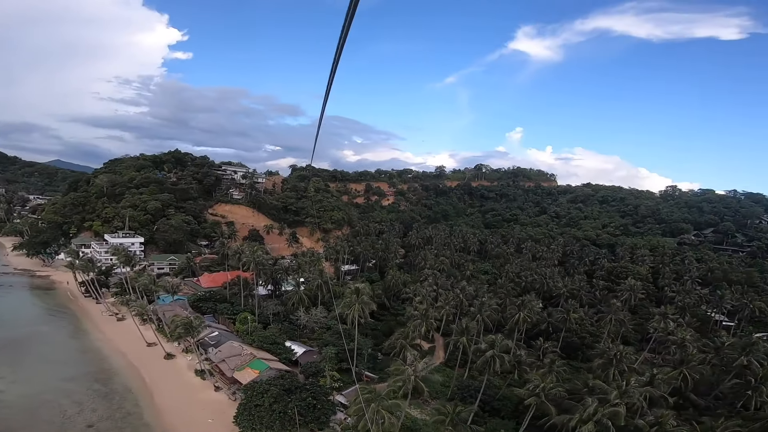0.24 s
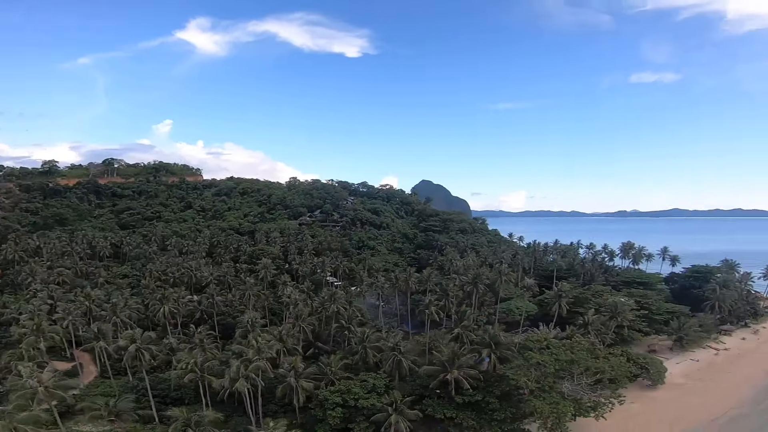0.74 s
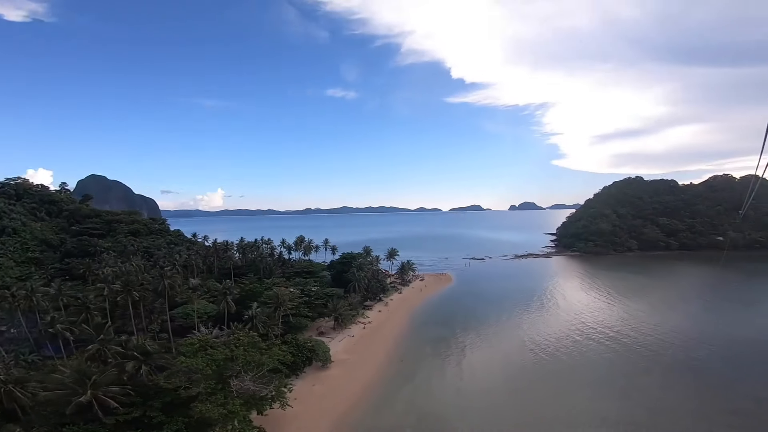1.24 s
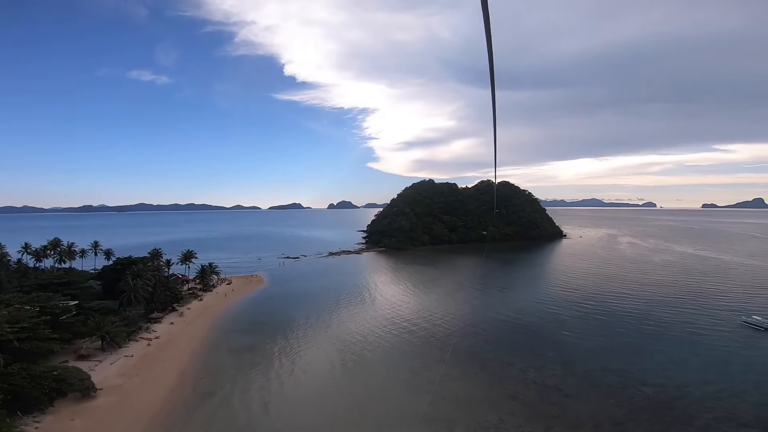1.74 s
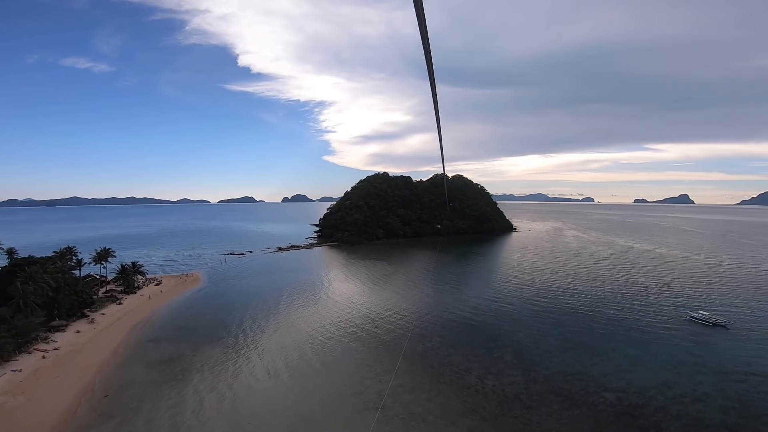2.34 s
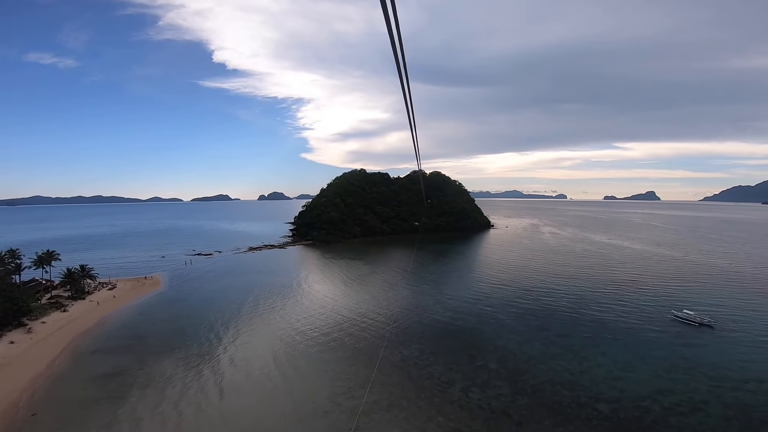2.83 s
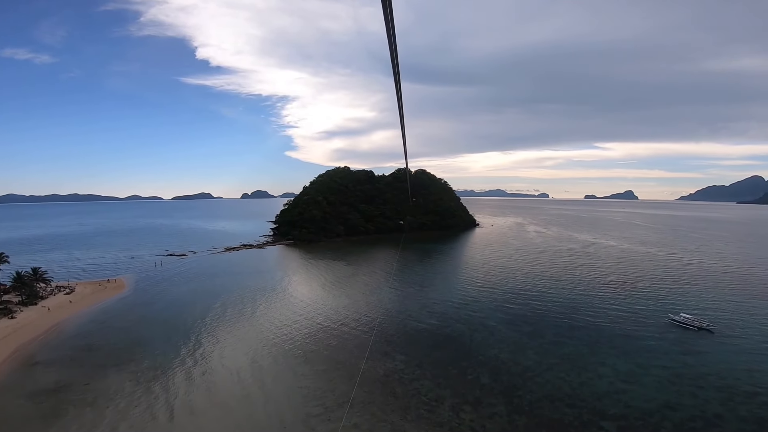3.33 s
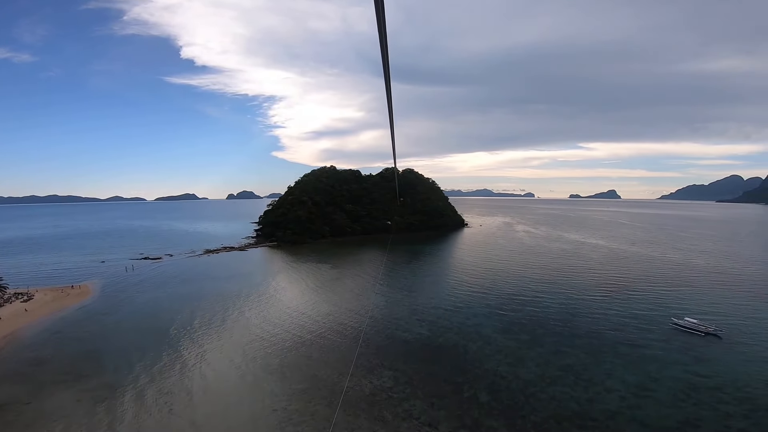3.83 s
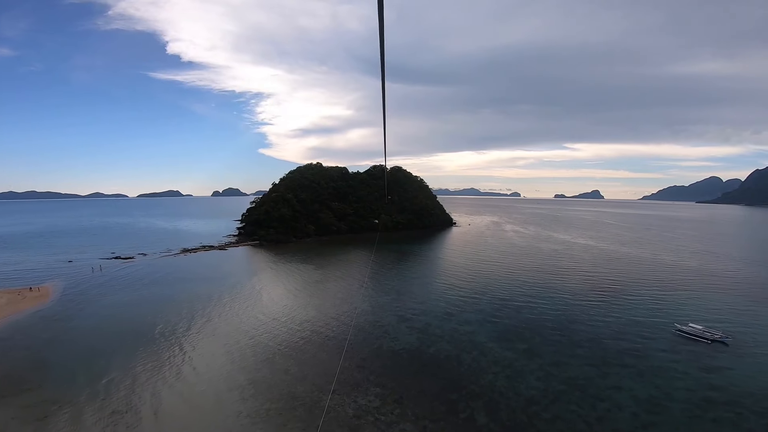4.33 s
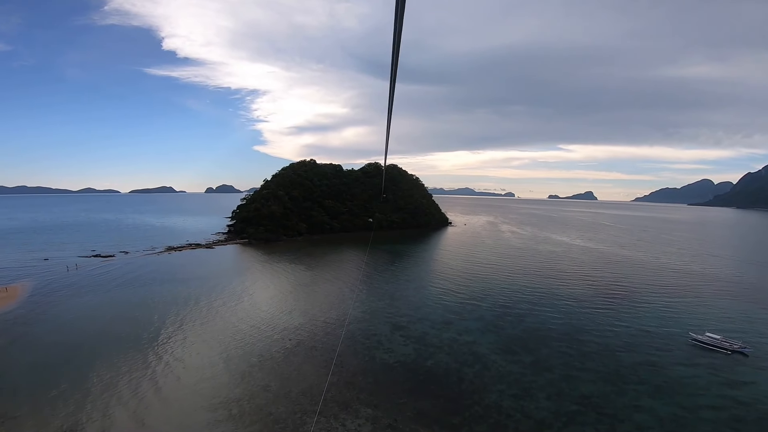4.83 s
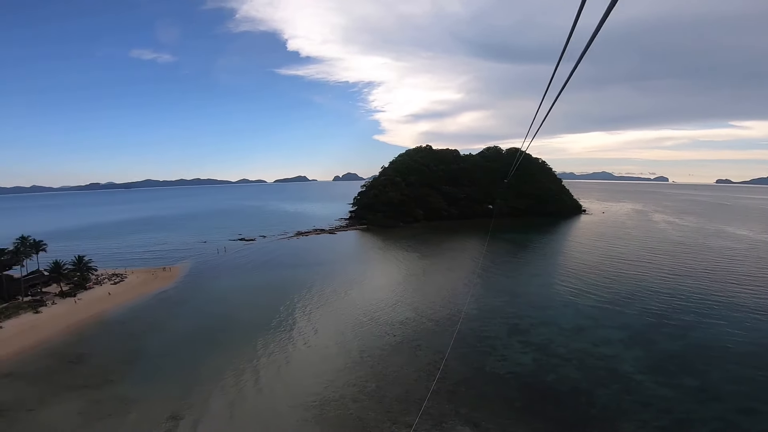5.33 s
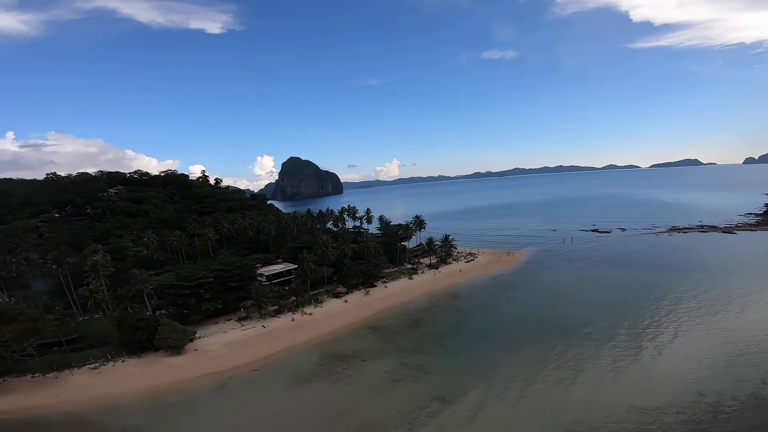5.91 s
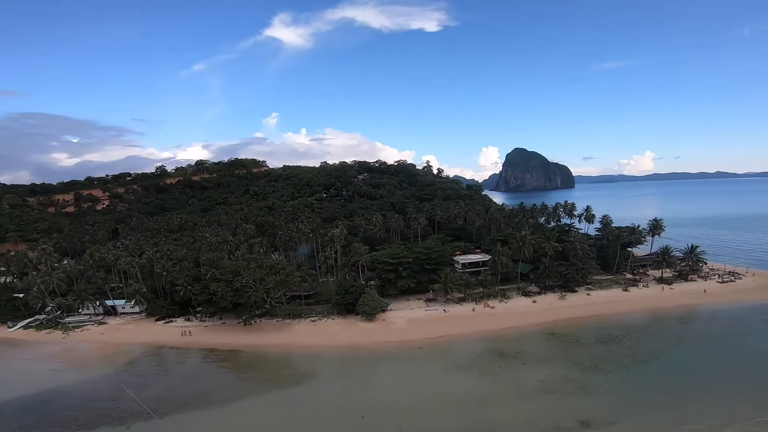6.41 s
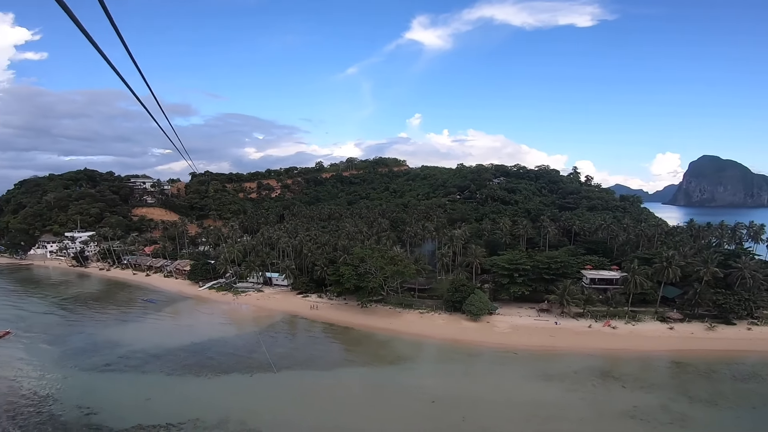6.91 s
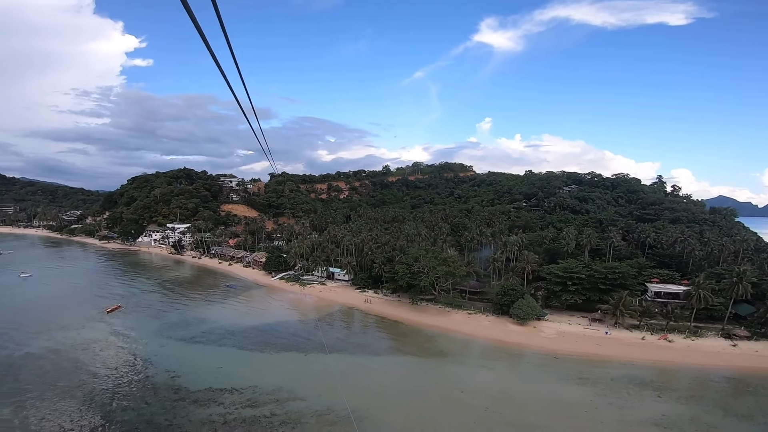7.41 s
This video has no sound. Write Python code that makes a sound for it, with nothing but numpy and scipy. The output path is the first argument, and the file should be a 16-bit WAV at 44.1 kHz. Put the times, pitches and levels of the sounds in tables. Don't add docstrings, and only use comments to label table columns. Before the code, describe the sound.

Close to the microphone, a zip line trolley whirs continuously on a steel cable, a dense hissing with a hollow singing tone. Hard wind slaps and rumbles first, drops suddenly as the camera swings, then a moderate airstream returns under a brighter whir. A flurry of eddies leads into a lull where the whir sings alone, before gusts strike again. Open air, no echo, nearly mono.

```python
import sys
import numpy as np
from scipy import signal
from scipy.fft import rfft, irfft, next_fast_len
from scipy.io import wavfile
from scipy.ndimage import uniform_filter1d, map_coordinates

SR = 44100
rng = np.random.default_rng(int(sys.argv[2]) if len(sys.argv) > 2 else 0)


def to_wav(s):
    ch = np.atleast_2d(s).T
    pcm = np.round(np.clip(ch, -1, 1) * 32767)
    wavfile.write(sys.argv[1], SR, pcm.astype(np.int16))


def voltage_ratio(level):
    return 10 ** (np.asarray(level, float) / 20)


N = 337806

# [t/s, turn: 0 back, 1 side, 2 ahead]
HEADING = [(0, 0), (.6, 0), (1.0, 1.04), (1.3, 1.3), (1.7, 1.5), (5.2, 2.5), (5.8, 1.18), (6.9, 0.96),
           (7.3, 1.2), (7.66, 1.8)]
# [f/Hz, level/dB per Hz]
WHIR_BACK = [(500, -51), (1200, -22), (2300, -17), (3200, -7.5), (4000, -8.5), (4950, -11.5), (5400, -16.5),
             (6400, -16), (8500, -27), (9000, -35), (9800, -33), (11200, -28), (13200, -41), (14000, -52),
             (15700, -62)]
WHIR_SIDEWAYS = [(700, -43), (850, -35.5), (1400, -30), (1750, -22.5), (2700, -16.5), (3400, -7.5),
                 (4400, -11.5), (5150, -14), (8400, -17.5), (9100, -28.5), (10200, -36), (11000, -34),
                 (12200, -43.5), (15700, -57)]
WHIR_AHEAD = [(710, -29), (2150, -10.5), (2900, 0.5), (3350, -2), (4200, -2.5), (5000, -6.5), (7760, -11),
              (8640, -15), (9200, -26), (10000, -27), (10900, -23.5), (11900, -34), (13200, -36),
              (15700, -58)]
# [t/s, level/dB]
WHIR_LEVEL = [(0, -20), (.6, -20), (.75, -17.5), (1.0, -17), (1.4, -18.5), (2, -17.5), (5.4, -18),
              (6.3, -16.5), (7, -17.5), (7.2, -18.5), (7.66, -19.5)]
# [t/s, f/Hz, boost/dB]
HOLLOW = [(0, 3380, 5.5), (.4, 3320, 5.5), (.68, 3350, 8), (.95, 3300, 12), (1.15, 3410, 8.5),
          (1.4, 3240, 5), (1.8, 3530, 5.5), (2.5, 3400, 3.5), (4.2, 3680, 4.5), (5.3, 3610, 5.5),
          (5.7, 3560, 8), (6.1, 3425, 11), (7, 3320, 8.5), (7.3, 3340, 10.5), (7.66, 3240, 8.5)]
# [t/s, band f/Hz, boost/dB, notch f/Hz, cut/dB]
SHADOW = [(0, 6300, 0, 7900, -1), (.35, 6200, 1, 7700, 1), (.6, 6070, 3, 7360, 1), (.78, 6000, -1, 6900, 4),
          (.82, 7900, -2, 6760, 7), (.95, 8000, -2, 6400, 6), (1.3, 8100, 2.5, 6600, 1.5),
          (3.2, 7850, 4.5, 6360, 2), (3.9, 6700, 2.5, 8600, 2), (4.5, 5960, 4.5, 8350, 2.5),
          (5.2, 6000, 3.5, 8800, 5), (5.6, 7300, 4.5, 9200, 10), (5.9, 8050, 1, 5500, -0.5),
          (6.8, 7600, 0.5, 5400, 3), (7.66, 7460, 1.5, 6540, 1)]
# [t/s, low mode f/Hz, level/dB, trough f/Hz, depth/dB, high mode f/Hz, level/dB]
PLATE_MODES = [(0, 1700, 0, 2750, -4, 4370, 2), (.7, 1700, 3.5, 2750, 0.5, 4500, 0),
               (1.35, 1700, 2.5, 2750, -2, 4480, -2), (1.65, 1500, 0, 2770, 3, 4900, 2),
               (1.95, 1750, -7, 2500, 0, 4400, 0), (2.25, 1400, 1.5, 2400, 0, 4400, 0),
               (2.55, 1400, -1.5, 2150, 2, 4800, 2), (3.2, 1600, 0.5, 2770, 1, 4400, 1),
               (3.6, 1500, -2, 2750, 3, 4300, 1.5), (4.05, 1400, -1, 2750, -0.5, 4250, 1),
               (4.6, 1550, -1.5, 2750, 0.5, 4800, 2.5), (5.25, 1600, -5, 2700, 0.5, 4800, 1.5),
               (5.55, 1150, 3, 3020, 5, 4340, -5), (5.9, 1800, -1.5, 3000, 0.5, 4400, -2),
               (6.45, 1760, 2.5, 2730, 2, 4700, 1.5), (6.75, 1750, 2.5, 2750, 0.5, 4300, 1.5),
               (7.1, 1600, 5, 2750, 3, 4470, 1.5), (7.66, 1700, -5, 2720, 8, 4800, 2)]
# [t/s, half length/s, level/dB]
GLINTS = [
    (.34, .1, 0),
    (1.68, 0.13, 3.5),
    (2.9, .3, 0.5),
    (5.35, .2, 0),
    (5.7, 0.13, 3),
    (7.2, .06, 1.5),
]

# [f/Hz, level/dB per Hz]
RUMBLE_COLOUR = [(15, -8), (30, -0.5), (55, 2), (80, -10), (130, -26.5), (300, -84)]
BUFFET_COLOUR = [(30, -45), (70, -1), (110, -1), (170, -6), (260, -22), (500, -47.5), (1200, -100)]
EDDY_COLOUR = [(60, -18.5), (200, 4.5), (400, -4.5), (800, -9.5), (1500, -16), (2500, -11), (6000, -48),
               (16000, -100)]
# [f/Hz, level/dB per Hz]
TEAR_COLOUR = [(60, -29.5), (200, 1.5), (450, -3), (800, -10), (1400, -21.5), (2500, -28.5), (5000, -43),
               (16000, -110)]
SPIT_COLOUR = [(300, -20.5), (800, -2.5), (1300, -2), (2000, -6.5), (3200, -15), (16000, -100)]
# [t/s, level/dB]
AIR = [(0, -19), (.1, -15), (.58, -21.5), (.63, -39.5), (.98, -31), (1.35, -34), (1.62, -28), (2.1, -25),
       (2.75, -27.5), (4.1, -24), (5.2, -23), (5.55, -32.5), (5.74, -32), (5.79, -41), (6.8, -40),
       (7.08, -26), (7.24, -19.5), (7.66, -16)]
# [t/s, half length/s, level/dB]
HEAVES = [(0.01, 0.03, -3), (0.14, 0.022, -10), (0.37, 0.2, 4.5), (0.58, 0.02, -4.5), (0.69, 0.094, 18.5),
          (0.9, 0.028, 11.5), (0.98, 0.03, -9), (1.08, 0.1, -9.0), (1.09, 0.02, 8), (1.2, 0.02, -6.5),
          (1.3, 0.03, 5.5), (1.47, 0.07, -6.0), (1.65, 0.025, 7), (1.72, 0.018, -5.0), (1.77, 0.02, 5.5),
          (1.83, 0.02, -5.0), (1.84, 0.07, 8.5), (1.89, 0.02, 4.5), (1.95, 0.02, -5.0), (2.01, 0.02, 1),
          (2.11, 0.02, -4.5), (2.19, 0.045, 4), (2.27, 0.02, -5.0), (2.37, 0.02, -8), (2.67, 0.022, -10),
          (2.75, 0.026, 7.5), (2.98, 0.045, 1), (3.09, 0.03, -9), (3.24, 0.03, 5), (3.43, 0.028, 0),
          (3.61, 0.05, -10), (3.72, 0.02, -1), (3.99, 0.02, -6), (4.07, 0.02, 6), (4.27, 0.063, -9),
          (4.47, 0.02, 3), (4.55, 0.03, -5.5), (4.66, 0.02, -8), (4.73, 0.027, 8), (4.82, 0.049, -12),
          (5.1, 0.087, -5), (5.41, 0.045, -7), (5.6, 0.03, -7.0), (5.79, 0.07, -7), (5.94, 0.03, -5.0),
          (6.03, 0.045, 3), (6.19, 0.03, 6.0), (6.33, 0.1, -1), (6.55, 0.091, 6.5), (6.76, 0.033, 9),
          (6.87, 0.045, -4.5), (6.89, 0.13, 22), (7.1, 0.05, 4), (7.22, 0.17, 8.5), (7.25, 0.02, -8),
          (7.32, 0.02, -6), (7.45, 0.1, 3), (7.58, 0.02, 4)]
# [t/s, half length/s, level/dB]
SURGES = [(0.0, 0.02, -4.5), (0.04, 0.023, 3.5), (0.4, 0.025, -9), (0.52, 0.018, 2), (0.58, 0.045, -2),
          (0.63, 0.086, 5.5), (0.66, 0.02, 4.0), (0.78, 0.022, -4.5), (0.95, 0.02, -5.5), (1.01, 0.02, 4.0),
          (1.2, 0.14, 3.5), (1.21, 0.02, -6), (1.42, 0.02, 1), (1.5, 0.015, -3), (1.51, 0.14, 3),
          (1.65, 0.041, 2.5), (1.97, 0.02, -6), (1.98, 0.11, 3.5), (2.0, 0.017, 5.5), (2.13, 0.018, 0),
          (2.19, 0.02, 4.5), (2.25, 0.02, -3.5), (2.38, 0.017, 5.5), (2.43, 0.02, -5), (2.61, 0.02, 5),
          (2.71, 0.045, -6.0), (2.92, 0.018, -10), (2.96, 0.15, 2.0), (3.28, 0.016, 5.5), (3.62, 0.03, 1.5),
          (3.72, 0.07, -4.0), (3.85, 0.02, -6.5), (4.17, 0.017, -2), (4.26, 0.03, -8), (4.36, 0.02, 5),
          (4.57, 0.02, 0), (4.64, 0.077, 2.0), (4.92, 0.026, 4), (5.29, 0.1, 3.5), (5.54, 0.045, -6),
          (5.7, 0.03, 7.5), (5.76, 0.022, -6.5), (5.89, 0.045, 2.5), (6.06, 0.15, 7.5), (6.26, 0.034, 9.5),
          (6.42, 0.02, -4.0), (6.71, 0.02, -4.5), (6.8, 0.025, 6), (6.91, 0.026, 6), (6.95, 0.03, 13.5),
          (7.01, 0.025, -10), (7.06, 0.016, 2), (7.11, 0.02, -12), (7.11, 0.07, 3), (7.16, 0.02, 7),
          (7.19, 0.019, -3.5), (7.22, 0.02, 5), (7.35, 0.02, 5), (7.39, 0.02, -1), (7.58, 0.02, -5.0),
          (.85, .06, -1),
    (1.1, 0.059, 0),
    (6.8, .035, -9),
    (6.933, .06, -5),
    (7.3, .06, 1.5),
]
# [t/s, half length/s, level/dB]
PUFFS = [(.1, .03, -1), (.25, 0.093, 4), (.39, 0.054, -11), (.68, 0.11, 7.5), (1.03, 0.041, 3.5),
         (1.4, 0.087, -3), (6.25, .04, 4), (6.93, 0.048, 10), (7.26, 0.066, -10), (7.4, 0.028, 5),
         (7.5, 0.044, -12),
         (1.49, 0.02, -3.0), (1.533, 0.02, 5), (1.583, 0.1, 11.5), (1.61, 0.02, 0), (1.65, 0.02, 2.0),
              (1.69, 0.02, -2.5), (1.97, 0.02, -2.5), (2.09, 0.17, -3.5), (2.31, 0.02, -2),
              (2.38, 0.03, 2.0), (2.49, 0.1, 2.0), (2.788, 0.15, -5), (2.96, 0.02, 3.0), (3.043, 0.03, 6),
              (3.24, 0.025, 5), (3.41, 0.054, 4), (3.57, 0.02, 1), (3.612, 0.02, -2.5), (3.832, 0.02, -2.5),
              (3.9, 0.02, -4), (4.05, 0.02, 0), (4.06, 0.02, 1.5), (4.31, 0.02, -1), (4.36, 0.02, 2.5),
              (4.4, 0.02, -4), (4.48, 0.15, 2), (4.622, 0.03, -1), (4.69, 0.027, 5), (4.83, 0.02, -1),
              (4.95, 0.03, 0), (4.998, 0.018, 2), (5.226, 0.056, 6), (5.417, 0.02, 6), (5.434, 0.15, 13),
              (5.457, 0.02, -3), (5.504, 0.05, -4.5), (5.617, 0.03, 2.5), (5.69, 0.085, 6.5),
              (5.76, 0.02, -5), (5.8, 0.02, 2)]
# [t/s, peak level/dB,
# thump level/dB re peak, bright edge level/dB re peak]
SLAPS = [(0.038, -25, 8, -17), (0.104, -12, -4, -9), (.15, -17, -4, -16), (.166, -15, -6, -7),
         (.194, -16, -6, -14), (0.21, -13.5, 1, -8), (.243, -15, -7, -9), (0.26, -13.5, 4, -15),
         (.284, -21, 11, -11), (0.31, -10, -2, -15), (.324, -12, -17, -8), (.341, -12.5, -1, -9.5),
         (.395, -16.5, -7, -13), (0.443, -9, 5.5, -29), (0.472, -13, -5, -20), (.503, -11.5, -4, -15),
         (.514, -10, -2, -20), (.538, -11, -1, -20), (0.559, -17, -6, -10), (.576, -12.5, -11, -10),
         (.584, -18, -5, -9), (.056, -17, 0, -19), (.225, -17, -4, -9), (.355, -22, 3, -10),
         (5.385, -28, -8, -10), (5.412, -23, -10, -2), (5.423, -21.5, -12, -3), (5.435, -24, -8, -5),
         (5.462, -25, -7, -6),
         (6.923, -28, -2, -4), (6.961, -13, -12, -11), (7.054, -22.5, 9, -7), (7.076, -16, 9.5, -18),
              (7.093, -19, -9, -4), (7.116, -12, 4, -14), (7.145, -18, 1, -9), (7.164, -14.5, 8, -17),
              (7.194, -11, -4, -27), (7.209, -14.5, 4, -20), (7.228, -10, -1, -22), (7.255, -19, -4, -16),
              (7.277, -20, 2, -16), (7.291, -11, -2, -27), (7.321, -17, -5, -15), (7.352, -13.5, -4, -11),
              (7.382, -20, -8, -22), (7.409, -15, -1, -22), (7.439, -12.5, -7, -17), (7.483, -14.5, 7, -22),
              (7.528, -13, 4, -12), (7.56, -18, -6, -13), (7.597, -13.5, 5, -10), (7.62, -20, 2, -13),
              (7.643, -12, -2, -12), (7.127, -20, -2, -9), (7.364, -15, -8, -9), (7.396, -16, -6, -15),
              (7.425, -19, -4, -16), (7.448, -22, -6, -12), (7.497, -21, -8, -17), (7.548, -14, -3, -14),
              (7.575, -20, -10, -11), (7.607, -15, 1, -5), (.118, -17, -4, -8), (.497, -14, -8, -9)]

# [f/Hz, level/dB per Hz]
WIDTH_COLOUR = [(40, -2), (100, -6), (210, 0), (1250, -7), (2500, -4), (3800, -3), (6200, -3), (7900, -2),
                (9200, -11), (11600, -14), (12000, -60)]
# [start t/s, end t/s, level/dB, gap from f/Hz, gap to f/Hz]
OPENINGS = [
    (0.354, .45, -44, 3500, 3800),
    (.97, 1.17, -44, 9300, 10000),
    (1.62, 2.15, -42, 3820, 7300),
    (3.2, 4.1, -41, 9100, 9300),
    (4.1, 4.73, -40.5, 2900, 7100),
    (4.86, 4.93, -47, 2520, 7600),
    (7.283, 7.39, -41, 3920, 4900),
]
# [from t/s, edge f/Hz]
BAND_EDGE = [(0, 13900), (.95, 15700), (1.03, 13900), (1.3, 14500), (1.6, 16000), (1.76, 14100),
             (2.15, 14600), (2.33, 15700), (2.43, 14600), (2.52, 15700), (2.62, 14600), (2.68, 15700),
             (2.85, 14500), (3.02, 15700), (3.07, 14500), (3.14, 15700), (3.28, 13750), (4.75, 14400),
             (5.62, 15700), (5.76, 14400), (6, 15700), (6.75, 14500), (7.35, 13700)]
# [f/Hz, share 0-1]
DROPOUTS = [(11000, 0), (12500, .06), (14300, .15), (14600, .7), (15100, .65), (15300, .3)]

USUAL_DB = -25
RUMBLE_DB, RUMBLE_GROWS = -29.5, 0.79
EDDY_DB, EDDY_GROWS = -38, 1.08


def unit(x):
    return x / np.sqrt(np.mean(x ** 2) + 1e-20)


def along(points, hz):
    f, v = np.transpose(points)
    return np.interp(np.log(hz + 1), np.log(f + 1), v)


def curves(rows, t):
    s, *cols = np.transpose(rows)
    return [np.interp(t, s, c) for c in cols]


def swells(rows, t):
    return sum(db * np.exp(-((t - s) / half) ** 2) for s, half, db in rows)


def wobble(rate):
    knots = rng.standard_normal(int(N * rate / SR) + 4)
    return map_coordinates(knots, [np.arange(N) * rate / SR])


def bump(hz, centre_hz, width_hz):
    return 1 / (1 + ((hz - centre_hz) / width_hz) ** 2)


def coloured(x, spectrum):
    m = next_fast_len(N + 8192, True)
    gain = voltage_ratio(along(spectrum, np.fft.rfftfreq(m, 1 / SR)))
    cep = irfft(np.log(gain + 1e-6), m)
    cep[1:m // 2] *= 2
    cep[m // 2 + 1:] = 0
    return irfft(rfft(x, m) * np.exp(rfft(cep)), m)[:N]


def steady(x, span_s, share):
    w = np.hanning(round(span_s * SR))
    power = abs(signal.fftconvolve(x ** 2, w / w.sum(), "same")) + 1e-9 * np.mean(x ** 2)
    return unit(x / power ** (np.clip(share, 0, 1) / 2))


def smeared(x, bins, frames):
    return uniform_filter1d(uniform_filter1d(x, size=bins, axis=0), size=frames, axis=1)


def random_cells(hz, t, frames):
    cells = rng.random((len(hz) // 8 + 1, len(t) // frames + 1))
    return np.kron(cells, np.ones((8, frames)))[:len(hz), :len(t)]


def stereo_width():
    hz, t, z = signal.stft(unit(coloured(rng.standard_normal(N), WIDTH_COLOUR)), SR, nperseg=1024)
    gain = 0
    for start, end, db, gap_lo_hz, gap_hi_hz in OPENINGS:
        outside_gap = (hz < gap_lo_hz) | (hz > gap_hi_hz)
        gain = gain + voltage_ratio(db) * np.outer(outside_gap, (t > start) & (t < end))
    missing = np.where(hz > 9200, .65, .2)
    gain = gain * (random_cells(hz, t, 3) > missing[:, None])
    return signal.istft(z * gain, SR, nperseg=1024)[1][:N]


def airstream(t):
    extra_db = curves(AIR, t)[0] - USUAL_DB
    rumble_db = RUMBLE_DB + RUMBLE_GROWS * extra_db + swells(HEAVES, t)
    buffet_db = USUAL_DB + extra_db + swells(SURGES, t)
    eddy_db = EDDY_DB + EDDY_GROWS * extra_db + swells(PUFFS, t)
    return rumble_db, buffet_db, eddy_db


def rumble():
    rumble_db = airstream(np.arange(N) / SR)[0]
    return voltage_ratio(rumble_db + 0.8) * steady(coloured(rng.standard_normal(N), RUMBLE_COLOUR), .07, .8)


def buffet_and_eddies():
    _, buffet_db, eddy_db = airstream(np.arange(N) / SR)
    buffet = steady(coloured(rng.standard_normal(N), BUFFET_COLOUR), 0.045, 0.61)
    pointed = buffet + 0.097 * (buffet ** 2 - 1)
    shedding_db = 2.3 * np.tanh(buffet) + 1.3 * wobble(25) + 2.1 * wobble(90)
    eddies = steady(coloured(voltage_ratio(shedding_db) * rng.standard_normal(N), EDDY_COLOUR), 0.037, 0.79)
    gathered_db = 0.4 * np.clip(eddy_db + 33.5, 0, None)
    return voltage_ratio(buffet_db - 1.02) * pointed + voltage_ratio(eddy_db - gathered_db + 3.5) * eddies


def slaps():
    t = np.arange(4096) / SR
    tears, spits, thumps = np.zeros((3, N + len(t)))
    for s, db, thump_db, spit_db in SLAPS:
        start = round(s * SR)
        rise_s = 0.0034 * np.exp(0.21 * rng.standard_normal())
        shape = (t / rise_s) * np.exp(1 - t / rise_s)
        burst = np.sign(rng.standard_normal(len(t))) * shape
        body = uniform_filter1d(burst, size=30) - uniform_filter1d(burst, size=150)
        burst = voltage_ratio(db - 15.5) * burst * np.linalg.norm(shape) / np.linalg.norm(body)
        tears[start:][:len(t)] += burst
        spits[start:][:len(t)] += voltage_ratio(spit_db) * burst
        thumps[start] = voltage_ratio(db + thump_db)
    torn = voltage_ratio(13) * coloured(tears[:N], TEAR_COLOUR)
    bright = voltage_ratio(11.5) * coloured(spits[:N], SPIT_COLOUR)
    return torn + bright + voltage_ratio(44.0) * coloured(thumps[:N], BUFFET_COLOUR)


def heading_colour(hz, t, turn):
    heading = np.clip(turn, 0, 2)
    colour_db = 0
    for k, spectrum in enumerate([WHIR_BACK, WHIR_SIDEWAYS, WHIR_AHEAD]):
        colour_db = colour_db + np.clip(1 - abs(heading - k), 0, 1) * along(spectrum, hz)
    band_hz, boost_db, notch_hz, cut_db = curves(SHADOW, t)
    colour_db = colour_db + boost_db * bump(hz, band_hz, 540) - cut_db * bump(hz, notch_hz, 430)
    shoulder_db = 0.035 * (airstream(t)[2] - EDDY_DB) - 0.5 * abs(np.gradient(turn, t)) * (turn > 1)
    return colour_db + swells(GLINTS, t) * (hz > 9000) + shoulder_db * bump(hz, 1800, 520)


def plate_colour(hz, t):
    low_hz, low_db, trough_hz, trough_db, high_hz, high_db = curves(PLATE_MODES, t)
    modes_db = low_db * bump(hz, low_hz, 260) + high_db * bump(hz, high_hz, 280)
    return modes_db - trough_db * bump(hz, trough_hz, 160) + 4.5 * bump(hz, 796, 70)


def trolley():
    throb_db = 0.098 * wobble(8.0) + 0.18 * wobble(25) + 0.22 * wobble(160)
    hz, t, z = signal.stft(rng.standard_normal(N) * voltage_ratio(throb_db), SR, nperseg=1024)
    hz = hz[:, None]
    (level_db,), (hollow_hz, hollow_db), (turn,) = curves(WHIR_LEVEL, t), curves(HOLLOW, t), curves(HEADING, t)
    hollow_width_hz = 233 - 35 * turn
    colour_db = heading_colour(hz, t, turn) + plate_colour(hz, t)
    colour_db = colour_db + hollow_db * bump(hz, hollow_hz, hollow_width_hz)
    local = abs(smeared(abs(z) ** 2, 9, 7))
    z = z * (local.mean() / local) ** (0.14 * bump(hz, hollow_hz, 700))
    sizzle = np.interp(t * 22, np.arange(200), rng.standard_normal(200))
    colour_db = colour_db + 0.84 * sizzle * np.clip((hz - 3800) / 3000, 0, 1)
    patches = unit(smeared(rng.standard_normal(z.shape), 14, 6))
    small_modes = unit(smeared(rng.standard_normal(z.shape), 3, 60))
    gain = voltage_ratio(colour_db + 0.43 * patches + 1.45 * small_modes * (1 - bump(hz, hollow_hz, 350)))
    gain *= voltage_ratio(level_db) / np.sqrt(np.mean(gain ** 2, axis=0))
    return signal.istft(z * gain, SR, nperseg=1024)[1][:N]


def scene():
    side = stereo_width()
    air = rumble() + buffet_and_eddies() + slaps()
    middle = trolley() * (1 - 0.31 * air) + air
    return np.array([middle + side, middle - side])


def roll_off(x):
    return signal.sosfilt(signal.butter(12, 15730, fs=SR, output="sos"), x)


def record(dry):
    soft = dry / (1 + abs(dry / .95) ** 6) ** (1 / 6)
    hz, t, z = signal.stft(soft, SR, nperseg=1024)
    starts, edge_hz = np.transpose(BAND_EDGE)
    step = np.clip(np.searchsorted(starts, t, "right") - 1, 0, None)
    edge_hz = edge_hz[step] - 250 * rng.random(len(t))
    lower_hz = np.where(edge_hz > 14850, 14450, 13700)
    falls_back = np.repeat(rng.random(len(t)), 2)[:len(t)] < .3
    edge_hz = np.where(falls_back, np.minimum(lower_hz, edge_hz), edge_hz)
    z = z * (random_cells(hz, t, 2) > along(DROPOUTS, hz)[:, None])
    kept = signal.istft(z * (hz[:, None] < edge_hz), SR, nperseg=1024)[1][:, :N]
    return roll_off(kept)


dry = scene()
out = record(dry)
to_wav(out)
```